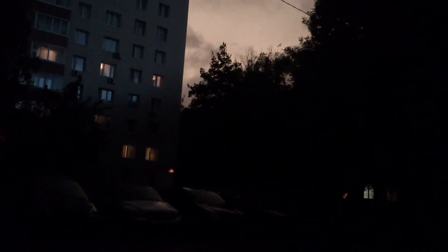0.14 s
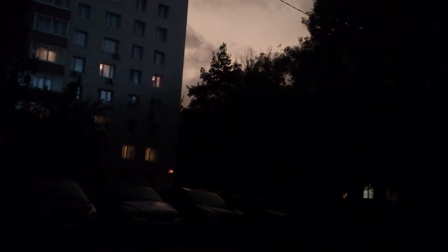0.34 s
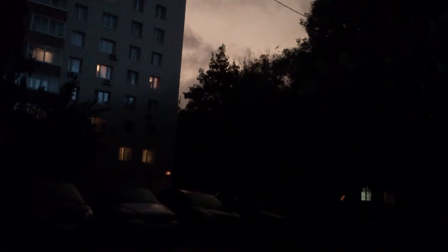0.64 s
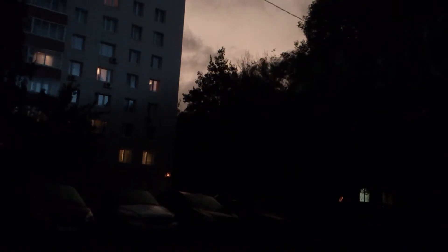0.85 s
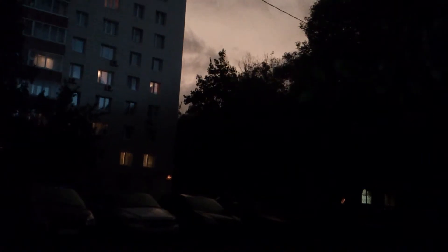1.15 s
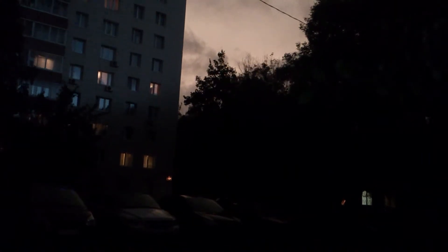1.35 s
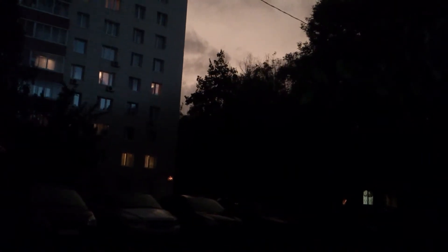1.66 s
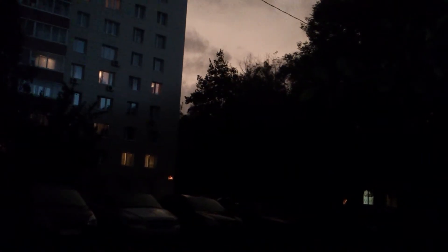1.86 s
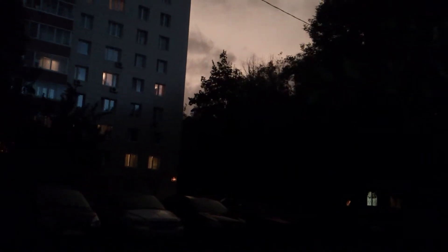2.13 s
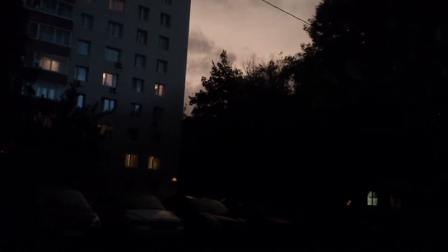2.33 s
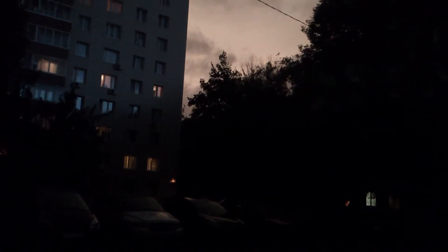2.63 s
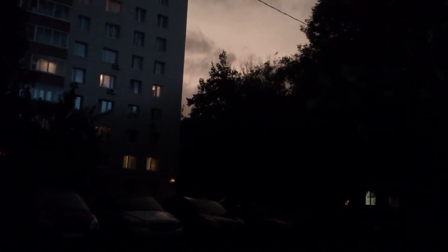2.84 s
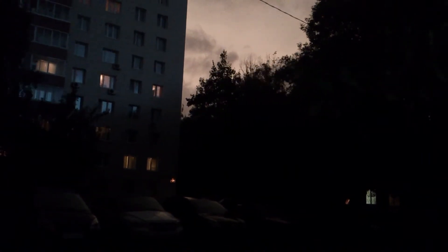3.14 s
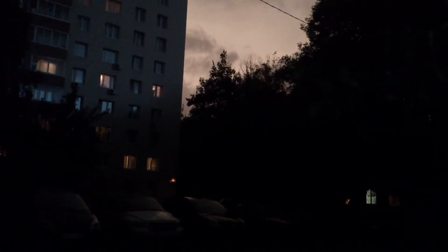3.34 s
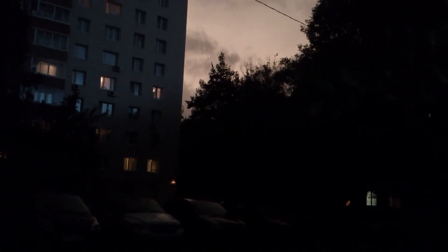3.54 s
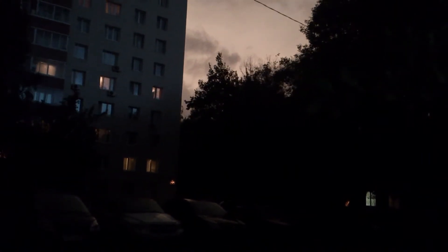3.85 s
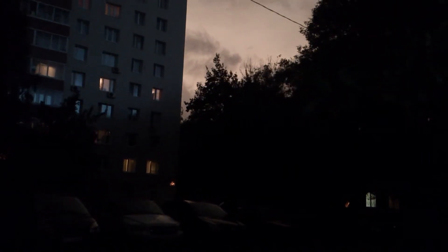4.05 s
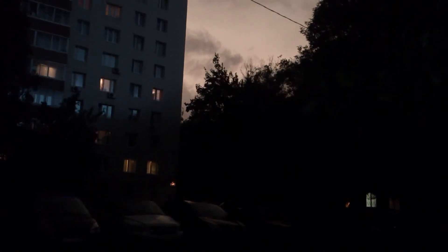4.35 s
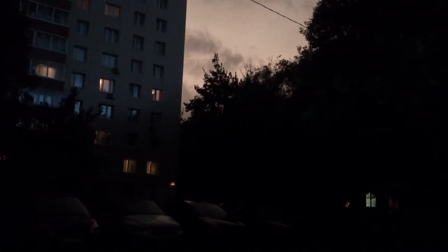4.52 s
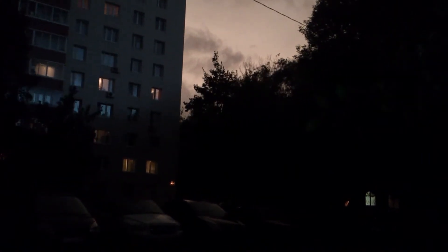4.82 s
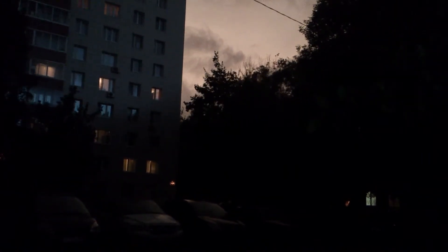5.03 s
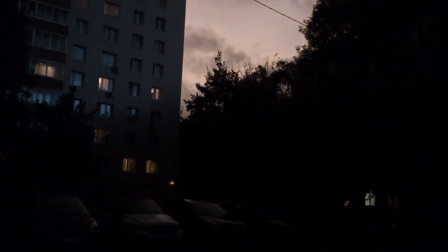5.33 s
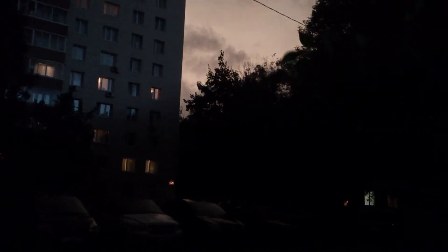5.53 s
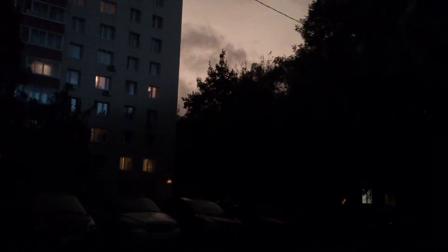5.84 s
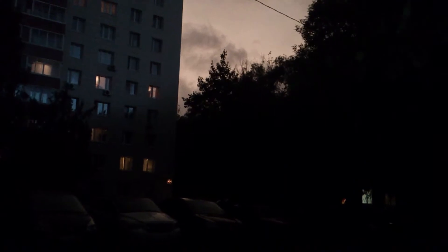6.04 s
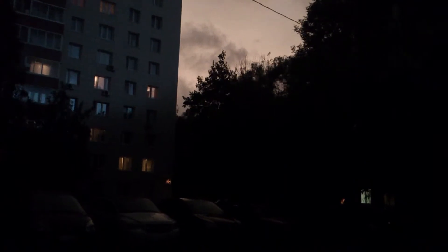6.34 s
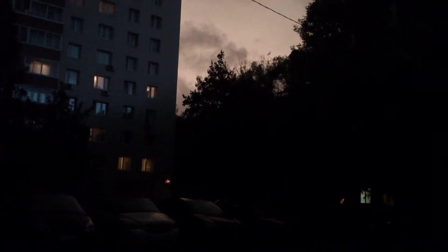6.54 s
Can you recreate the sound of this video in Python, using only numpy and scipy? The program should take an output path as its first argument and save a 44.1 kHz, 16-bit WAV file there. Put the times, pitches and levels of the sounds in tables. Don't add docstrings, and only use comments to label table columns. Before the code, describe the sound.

A residential yard with tall flats and trees at dusk, heard through a small camera microphone. For the first 0.9 s there is only low, slightly unsteady distant traffic hum and faint steady hiss. At about 0.93 s thin, dry cracks of thunder begin overhead, with more at 1.2 and 1.3-1.4 s. At 1.66 s the main thunder bursts in, with thick booming peals packed closely together, rough crackle and sharp clicking shock fronts, strongest around 2.0-2.3 s, where the microphone overloads. Heavy blows continue at 2.7-2.8, 3.15, 3.35 and 3.75 s, with short diffuse echoes from house fronts. From 4.3 s the sound is farther and duller: rounded booms near 4.45, 4.85, 5.1-5.3 and 5.65 s over a low roll. A last weak thud comes near 6.05 s, and the rumble fades toward the hum by 6.7 s.

```python
import sys
import numpy as np
from scipy import signal
from scipy.fft import rfft, irfft, next_fast_len
from scipy.io import wavfile
from scipy.ndimage import map_coordinates

SR = 44100
rng = np.random.default_rng(int(sys.argv[2]) if len(sys.argv) > 2 else 0)


def ratio(d):
    e = np.asarray(d, float) / 20
    return 10 ** e


def wav_record(signal):
    frames = np.transpose(np.atleast_2d(signal))
    bounded = np.clip(frames, -1, 1)
    quanta = np.round(bounded * 32767).astype(np.int16)
    wavfile.write(sys.argv[1], SR, quanta)


N = 294533
T = np.arange(N) / SR

# freq_hz, density_db (per Hz)
TOWN_COLOUR = [(15, -47), (25, -16), (56, 5.5), (84, 8.5), (412, 0), (1140, -8.5), (1250, -12.5),
               (1450, -11.5), (1590, -11.5), (4500, -20.5), (5850, -43), (9900, -120)]
# freq_hz, density_db (per Hz)
HISS_COLOUR = [(2060, -32.5), (3500, -0.5), (3840, 1), (4660, -8.5), (5320, -5), (8380, -4), (9440, 0),
               (11000, -10), (14900, -17), (15600, -15)]
# freq_hz, level_db
CAMERA_WHINE = [(9717, -82.5)]
# freq_hz, t60_s
WALL_DECAY = [(60, 0.37), (300, 0.48), (1500, 0.74), (5000, 0.31)]
# start_s, peak_db, echo_db, echo_t60_s
SHOCK_FRONTS = [(1.754, -58, 0, 0.62), (1.8193, -48, -15, 0.38), (1.8453, -41.5, -6, 0.45),
                (1.9001, -45, -4.5, 0.86), (2.025, -45, -16.5, 0.24), (2.0562, -46, -12, 0.34),
                (2.1041, -42, -16.5, 0.41), (2.2607, -29, -12.5, 0.8), (2.2657, -30, -21, 0.98),
                (2.6938, -48, -16, 0.15), (3.1645, -43.5, -13, 0.18), (3.3694, -49, -12, 0.2)]
# freq_hz, density_db (per Hz)
CLICK_COLOUR = [(500, -17), (1500, 9), (5000, 6.5), (10000, -12.5), (15000, -19)]
# freq_hz, density_db (per Hz)
ECHO_COLOUR = [(1500, -11.5), (4000, 7), (6000, -6), (9500, -11.5), (11000, -24.5), (15000, -30.5)]
# time_s, level_db, air_db (treble kept by the air)
ROLL_COURSE = [(0.92, -54, 3), (1.11, -46.5, 1), (1.29, -51, 8), (1.42, -35.5, 0.5), (1.6, -36.5, 1),
               (1.665, -27.5, -3.5), (1.85, -15.5, -5.5), (2.05, -18.5, -3.5), (2.42, -18.5, -4),
               (2.701, -21, -4), (3.001, -24.5, -5.5), (3.3, -20, -3.5), (3.578, -26.5, -4),
               (3.84, -21, -3.5), (4.3, -31, -2), (4.75, -27.5, -9.5), (5.3, -30, -12.5),
               (6.68, -40.5, -14)]
# start_s, peak_db, pitch_hz, held_s, crackle_db
BRANCH_CRACKS = [(0.93, -24, 280, 0.014, -1.5), (0.98, -29, 390, 0.0075, 3),
                 (1.026, -34.5, 398, 0.015, 5.5), (1.183, -21.5, 196, 0.03, -8.5),
                 (1.306, -28, 147, .05, 1), (1.362, -21, 376, 0.02, -3.5)]
# start_s, peak_db, pitch_hz, held_s, crackle_db
TRUNK_PEALS = [(1.656, -6.5, 210, 0.046, -13.5), (1.793, -2.5, 204, 0.05, -18), (1.908, -7, 240, 0.1, -8.5),
               (2.022, -1, 335, .045, -10.5), (2.1, -5.5, 227, .01, -5), (2.256, 3, 187, 0.016, -10),
               (2.311, -3.5, 357, .04, -11), (2.47, -5.5, 149, .01, -19), (2.689, -5.5, 161, 0.044, -7.5),
               (2.75, -5.5, 346, 0.035, -10), (2.815, -7, 355, .04, -9.5), (3.091, -12, 310, 0.015, -10),
               (3.161, -3, 324, .01, -5.5), (3.363, -6, 337, 0.019, -9.5), (3.733, -11, 139, .02, -6.5),
               (4.387, -15, 233, 0.057, -8), (4.464, -10, 285, 0.023, -11.5), (4.864, -4, 288, 0.023, -15),
               (5.085, -13.5, 280, 0.054, -13), (5.2, -10, 273, 0.025, -21), (5.33, -28.5, 210, 0.16, 0.5),
               (5.628, -9, 244, .04, -25), (5.699, -12.5, 240, .01, -25), (6.044, -23, 134, 0.0075, -17)]
# start_s, peak_db, pitch_hz, t60_s
FOOT_THUDS = [(1.666, -7.5, 77.6, 0.24), (2.719, -4.5, 150, .1), (2.783, -6, 154, 0.11),
              (3.168, -5, 147, .15), (3.735, -7.5, 145, 0.18), (5.327, -11.5, 148, 0.16),
              (5.63, -9, 104, .14), (5.667, -10.5, 96, .2), (6.046, -24, 136, .08)]
# start_s, peak_db, pitch_hz, t60_s
KINK_KNOCKS = [
    (0.95, -34, 880, 0.2),
    (1.4, -35.5, 1000, 0.32),
    (1.656, -13, 613, 0.16),
    (5.447, -30, 885, 0.044),
]
# freq_hz, density_db (per Hz)
BRANCH_COLOUR = [(24, -55), (40, -20.5), (81, -6), (156, 2.5), (348, -4.5), (386, -3), (559, -12.5),
                 (1100, -11.5), (1360, -16), (2090, -10.5), (3800, -21), (5500, -46), (7150, -84.5),
                 (12100, -120)]
# freq_hz, density_db (per Hz)
TRUNK_COLOUR = [(15, -56), (25, -33), (59, -6.5), (90, -5.5), (136, 2), (199, -2), (261, -1.5), (320, -0.5),
                (375, -1.5), (470, -7.5), (790, -9.5), (1190, -20.5), (3830, -46.5), (5500, -73),
                (7150, -87), (12100, -120)]
# freq_hz, change_db
FAR_AIR_LOSS = [(500, -3), (1500, -4), (2500, -2.5), (4000, -16.5)]
BAND_EDGES = [150, 450, 1400]
STAGE_TIMES = [1.62, 1.66, 2.6, 4.3]

TOWN_DB, HISS_DB = -49.5, -62.5
BOOM_DB, SIZZLE_DB = -8, -10.5
SIZZLE_LOSS = 1.664
PEAL_T60_S, PEAL_BOOM_DB = 0.15, -4.5
KICK, KICK_S = 1.1, 0.00074
MIC_HZ = 51.6


def unit(x):
    return x / np.sqrt(np.mean(x ** 2) + 1e-20)


def along(points, hz):
    f, v = np.transpose(points)
    return np.interp(np.log(hz + 1), np.log(f + 1), v)


def wobble(rate):
    return map_coordinates(rng.standard_normal(N // 100), [T * rate])


def add(x, s, piece):
    room = x[..., round(s * SR):][..., :piece.shape[-1]]
    room += piece[..., :room.shape[-1]]


def filtered(x, response):
    m = 2 * next_fast_len(N // 2 + SR // 4)
    return irfft(rfft(x, m) * response(np.fft.rfftfreq(m, 1 / SR)), m)[..., :N]


def causal(points):
    def response(hz):
        cepstrum = irfft(np.log(np.maximum(ratio(along(points, hz)), 1e-6)))
        cepstrum[1:len(hz) - 1] *= 2
        cepstrum[len(hz):] = 0
        return np.exp(rfft(cepstrum))
    return response


def banded(points):
    def response(hz):
        below = [np.clip(0.5 - np.log2((hz + 1) / edge), 0, 1) for edge in BAND_EDGES]
        shares = np.diff([0 * hz, *below, 1 + 0 * hz], axis=0)
        parts = shares * causal(points)(hz)
        return parts / np.sqrt(np.mean(np.abs(parts) ** 2, axis=1))[:, None]
    return response


def swell(rise, t60, bend, hold=0):
    t = T[:SR]
    fall = ratio(-60 * (np.maximum(t - hold, 0) / max(t60, 0.003)) ** bend)
    return (1 - np.exp(-(t / rise) ** 2)) * fall


def coloured_noise(points):
    return unit(filtered(rng.standard_normal(N), lambda hz: ratio(along(points, hz))))


def town():
    whine = sum(ratio(db - 9) * np.sin(2 * np.pi * hz * T + 0.8 * wobble(12)) for hz, db in CAMERA_WHINE)
    hum = ratio(TOWN_DB + 1.3 * wobble(4.4)) * coloured_noise(TOWN_COLOUR)
    hiss = ratio(HISS_DB + 0.4 * wobble(1.4)) * coloured_noise(HISS_COLOUR)
    return hum + hiss + whine


def walls(x):
    hz, t, z = signal.stft(rng.standard_normal(SR * 2 // 3), SR, nperseg=256)
    fall = ratio(-60 * t / along(WALL_DECAY, hz)[:, None])
    tail = signal.istft(z * fall, SR, nperseg=256)[1]
    delayed = np.pad(x, (1200, 0))
    return signal.fftconvolve(delayed, tail / np.linalg.norm(tail))[:N]


def fronts():
    step, echo = np.zeros((2, N))
    for s, db, echo_db, t60 in SHOCK_FRONTS:
        step[round(s * SR)] = ratio(db + 16.5)
        add(echo, s, ratio(db + echo_db) * swell(0.012, t60, 0.72))
    hiss, steady = filtered(rng.standard_normal(N) * [echo, np.ones(N)], causal(ECHO_COLOUR))
    return filtered(step, causal(CLICK_COLOUR)) + ratio(1.5) * hiss / np.std(steady)


def booms():
    out = np.zeros(N)
    stretches = [(s, db + PEAL_BOOM_DB, hz, PEAL_T60_S, held)
                 for s, db, hz, held, _ in BRANCH_CRACKS + TRUNK_PEALS]
    stretches += [(*thud, 0) for thud in FOOT_THUDS + KINK_KNOCKS]
    for s, db, hz, t60, held in stretches:
        band = signal.butter(2, [hz * 0.86, hz * 1.197], "bandpass", fs=SR, output="sos")
        dull = signal.butter(4, hz * 1.69, fs=SR, output="sos")
        rumble = swell(0.0025, 1.16 * t60, 1.9, held) * rng.standard_normal(SR)
        kick = KICK * np.exp(-(T[:SR] / KICK_S - 4) ** 2)
        ring = signal.sosfilt(np.vstack([band, dull]), rumble + kick)
        start = s - 0.002 - 0.789 / hz
        add(out, start, ratio(db) * ring / np.abs(ring).max())
    return out


def shocks(rate, spread_db, haze_db):
    draw = rng.random((3, N))
    size = ratio(spread_db * draw[1]) * np.sign(draw[2] - 0.5)
    struck = draw[0] < rate / SR
    return unit(unit(size * struck) + ratio(haze_db) * rng.standard_normal(N))


def strengths():
    times, level, air = np.transpose(ROLL_COURSE)
    begun = np.clip((T - times[0]) / 0.018, 0, 1)
    bands = (level + BOOM_DB - 0.39 * air, level, level + air, level + SIZZLE_DB + SIZZLE_LOSS * air)
    power = np.array([begun * ratio(np.interp(T, times, db)) for db in bands]) ** 2
    for s, db, hz, held, crackle_db in BRANCH_CRACKS + TRUNK_PEALS:
        deep_db = -5 - 7 * np.log2(hz / 100)
        air_db = np.interp(s, times, air)
        sizzle_db = crackle_db + 1 + SIZZLE_DB + 0.63 * air_db + 0.092 * (crackle_db + 8.5)
        levels = ratio(db - 10 + np.array([[deep_db], [0], [crackle_db + 2], [sizzle_db]]))
        add(power, s - 0.003, (levels * swell(0.0034, PEAL_T60_S, 1.17, held)) ** 2)
    return np.sqrt(power)


def thunder():
    train = shocks(rate=1500, spread_db=12.5, haze_db=0.5) * ratio(0.89 * wobble(14))
    gusts = ratio(1.26 * np.array([wobble(11) for _ in range(len(BAND_EDGES) + 1)]))
    drive = strengths() * gusts * train
    far_colour = [(hz, db + along(FAR_AIR_LOSS, hz)) for hz, db in TRUNK_COLOUR]
    parts = [(BRANCH_COLOUR, [0.94, 0.23, 0, 0]),
             (TRUNK_COLOUR, [0.06, 0.9, 0.95, 0]),
             (far_colour, [0, 0, 0.052, 0.84])]
    out = booms()
    for colour, share in parts:
        heard = np.interp(T, STAGE_TIMES, share) * drive
        out += filtered(heard, banded(colour)).sum(axis=0)
    return out


def scene():
    bolt = thunder()
    return (bolt + ratio(-13) * walls(bolt) + fronts() + town())[None]


def band_limit(x):
    return signal.sosfilt(signal.butter(12, 15700, fs=SR, output="sos"), x)


def record(dry):
    heard = signal.sosfilt(signal.butter(3, MIC_HZ, "highpass", fs=SR, output="sos"), dry)
    clipped = heard / (1 + np.abs(heard / 0.98) ** 8) ** (1 / 8)
    return band_limit(clipped)


dry = scene()
out = record(dry)
wav_record(out)
```